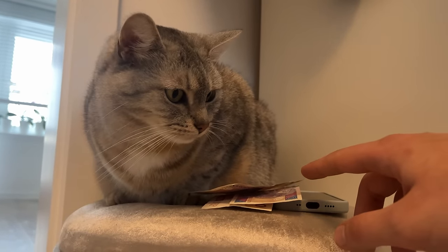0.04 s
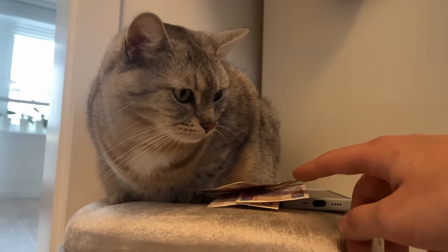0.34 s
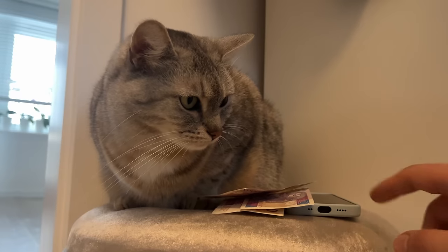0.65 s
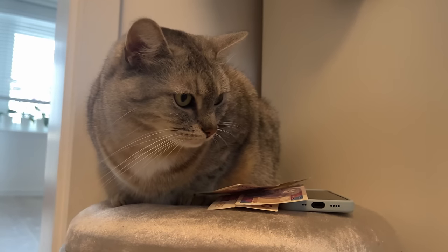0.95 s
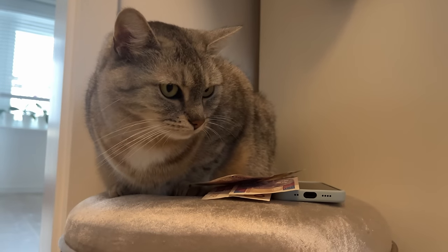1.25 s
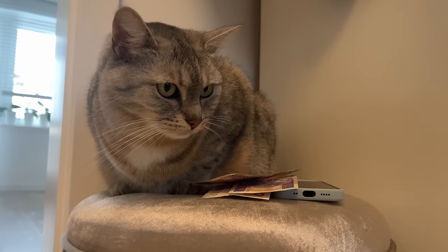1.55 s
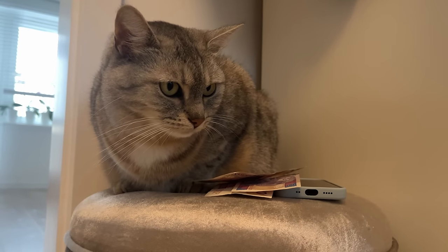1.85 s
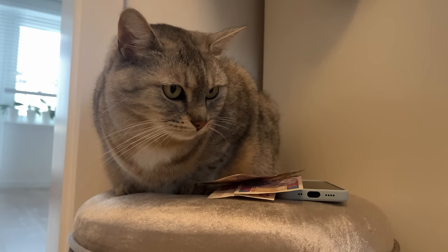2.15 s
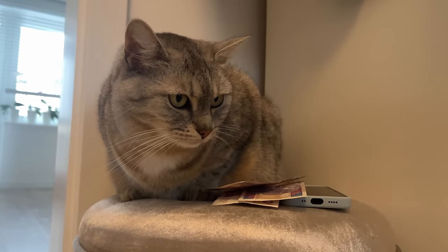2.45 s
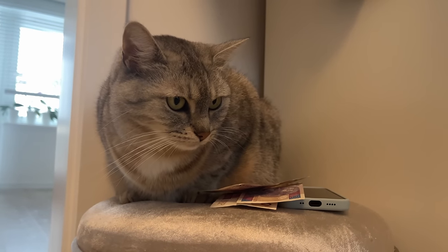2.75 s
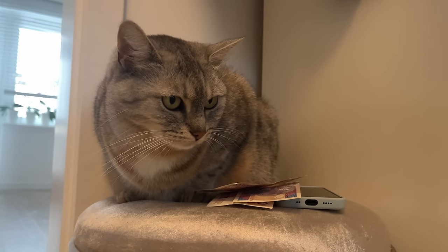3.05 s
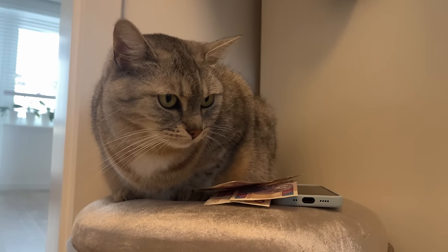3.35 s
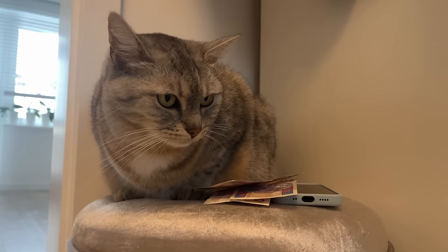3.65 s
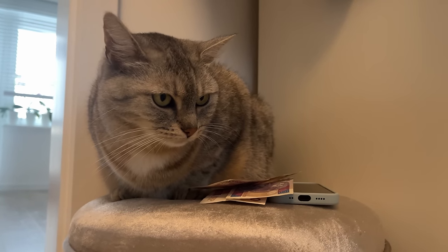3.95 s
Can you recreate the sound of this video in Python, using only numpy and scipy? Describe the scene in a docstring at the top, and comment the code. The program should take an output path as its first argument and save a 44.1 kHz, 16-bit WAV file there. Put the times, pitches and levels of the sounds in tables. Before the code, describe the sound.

Close cat yowling indoors, its drawn-out call sliding down into a raspy growl.

```python
"""A cat's gruff grunt swoops up into a clear yowl, slides down, turns hoarse and settles into a
closed-mouth growl that begins to rise again. The wary cat is close by in a small room, warning off a
hand with one unbroken call. Its vocal folds make the tone and its throat and mouth shape it; uneven
pulses and puffs of air make the rasp. A low rumble and a faint hiss lie underneath."""
import sys
import numpy as np
from scipy import signal
from scipy.fft import rfft, irfft, next_fast_len
from scipy.io import wavfile
from scipy.ndimage import uniform_filter1d

SR = 44100
rng = np.random.default_rng(int(sys.argv[2]) if len(sys.argv) > 2 else 0)


def unload_audio(sound):
    """Save the sound as a 16-bit wav file, at the path given as the first command line argument."""
    columns = np.transpose(np.atleast_2d(sound))
    # keep every value between -1 and 1, then stretch to whole-number steps
    steps = np.round(np.clip(columns, -1, 1) * 32767)
    wavfile.write(sys.argv[1], SR, steps.astype(np.int16))


N = 176400
TIME = np.arange(N) / SR
FFT_SIZE = next_fast_len(N + SR)
BIN_HZ = np.maximum(np.arange(FFT_SIZE // 2 + 1) * SR / FFT_SIZE, 1)

# How fast the vocal folds vibrate: time_s, pitch_hz
GRUNT_PITCH = [(.175, 212.8), (.257, 167.5), (.306, 197.7)]
CALL_PITCH = [(.316, 290.4), (0.395, 406.2), (0.55, 538.6), (0.625, 579.2), (0.68, 554.5), (0.74, 596.5),
              (0.77, 593.6), (0.92, 632.5), (1.2, 623), (1.47, 571), (1.72, 492.8), (1.82, 481),
              (1.9, 447.9), (1.92, 419.6), (1.945, 429.5), (1.975, 393.6), (2.13, 331.9), (2.285, 336.5),
              (2.405, 276.8), (2.491, 275.5), (2.55, 306.7), (2.69, 207.8), (2.775, 214.4), (2.8, 192.4),
              (2.945, 199), (3.115, 183), (3.147, 192.7), (3.54, 184), (3.665, 215.7), (3.755, 206.4),
              (3.99, 282.2)]
# Strength of the harmonics (multiples of the pitch): time_s, first_db, second_db, third_db, upper_db
GRUNT_LEVELS = [(.192, -42.5, -65.5, -78.5, -76.5), (.203, -30, -39.5, -42, -53.5),
                (.255, -24, -38, -32, -42), (.29, -32, -38.5, -42, -63), (.304, -25.5, -39.5, -44, -57.5)]
CALL_LEVELS = [(0.315, -44, -39.5, -58, -61), (0.373, -33.5, -51.5, -50, -45.5),
               (0.487, -26.5, -53, -59, -49.5), (0.791, -31, -45, -61, -41),
               (0.878, -36.5, -48.5, -66.5, -43), (1.22, -40, -47, -67, -42.5),
               (1.312, -32.5, -48, -60.5, -39.5), (1.451, -32.5, -48.5, -61.5, -45.5),
               (1.58, -30.5, -52, -58, -44), (1.83, -26.5, -49, -56, -49), (1.945, -32.5, -46.5, -50, -42),
               (1.991, -37.5, -50, -50.5, -43.5), (2.15, -43, -45.5, -52.5, -48),
               (2.278, -41, -52, -50, -48.5), (2.389, -55.5, -43.5, -54, -49.5),
               (2.569, -57.5, -46.5, -53, -53.5), (2.635, -57.5, -38, -57.5, -49),
               (2.691, -37.5, -42.5, -51, -52), (2.981, -34, -47.5, -46, -60.5),
               (3.499, -33.5, -51.5, -54, -75), (3.781, -39, -42, -62, -59), (4, -51.5, -46.5, -62, -59)]
# Hoarseness, the uneven part of the pulses: time_s, level_db
RASP_LEVELS = [(.187, -69), (.202, -43.5), (.255, -35.5), (.31, -38.5), (.37, -48), (.55, -60), (.81, -54),
               (.92, -66), (1.8, -66), (1.93, -48), (2.15, -45), (2.24, -50.5), (2.32, -43), (2.49, -43.5),
               (2.54, -58), (2.62, -47.5), (2.82, -47.5), (3.5, -52), (4, -49.5)]
# Moments when the pulses fall into groups: centre_s, half_length_s, pulse_count, base_level_db
ROUGH_SPELLS = [(2.155, 0.047, 2, -48), (2.383, 0.08, 2, -53), (2.825, .035, 3, -53), (3.11, .025, 3, -56),
                (3.3, .08, 3, -58.5)]
# Moments when the nose rings: centre_s, half_length_s, boost_db
NASAL_SWELLS = [(1.537, 0.08, 4.5), (2.169, .18, 11.5)]
# How throat and mouth shape the upper harmonics, the rasp and the spit: frequency_hz, gain_db
THROAT_COLOUR = [(720, -3), (1000, 4.5), (1350, -4.5), (1700, -10), (1950, -19), (2300, -42), (2800, -27.5),
                 (3300, -50), (3800, -38), (4350, -29), (4900, -59.5)]
RASP_COLOUR = [(90, -21), (165, -3.5), (280, -12), (360, -4), (450, 9), (560, 2), (760, -8.5),
               (1620, -11.5), (2130, -40), (2780, -33), (3300, -53), (4300, -39), (5500, -62)]
SPIT_COLOUR = [(5800, -12.5), (7000, 8), (11000, -15)]
# How much louder the left microphone is than the right: frequency_hz, balance_db
LEFT_BALANCE = [(260, 0.5), (405, -8), (500, -4.5), (570, 1), (770, 2.5), (970, -9.5), (1190, 3.5),
                (1450, -12), (1950, 7.5), (2900, -4.5), (4400, -16.5), (6000, 4)]
# How far the left wave runs ahead of the right: frequency_hz, lead_radians
LEFT_LEAD = [(220, -0.36), (350, -1.4), (520, -0.36), (800, -1.6), (1700, 0.76)]
# Tone of the background noises: frequency_hz, gain_db
HISS_COLOUR = [(25, -10.5), (160, 2.5), (300, -5), (550, -9.5), (800, -21), (4400, -26), (5900, -38.5),
               (7900, -31.5), (10200, -42.5), (12200, -37.5)]
RUMBLE_COLOUR = [(25, -24.5), (70, 11.5), (95, -9.5), (300, -56.5)]
# How alike the hiss is on the left and right: frequency_hz, correlation
HISS_LIKENESS = [(1000, 0.46), (4000, 0), (12000, 0.54)]
# Loudness of the rumble: time_s, level_db
RUMBLE_LEVELS = [(0, -54.5), (1.17, -56.5), (1.4, -66), (4, -64)]

WAVER_SHARE, WAVER_HZ = .0032, 14   # slow pitch wobble
JITTER_CLEAR, JITTER_HOARSE, JITTER_HZ = .002, .027, 60   # fast wobble, as shares of the pitch
SHIMMER_CLEAR_DB, SHIMMER_HOARSE_DB, SHIMMER_HZ = .2, .9, 32   # loudness flutter
FULL_RASP_DB, BREAKUP_DB = -44, 13   # a full rasp takes BREAKUP_DB from the upper harmonics


def cat(harmonic_count=20):
    """Vibrating vocal folds make a clean tone that shakes more and gains a rasp as it turns hoarse."""
    pitch, = in_time(np.vstack([GRUNT_PITCH, CALL_PITCH]))
    *low_db, upper_db = in_time(np.vstack([GRUNT_LEVELS, CALL_LEVELS]))
    rasp_db, = in_time(RASP_LEVELS)
    hoarse = from_db(np.minimum(rasp_db - FULL_RASP_DB, 0))
    in_threes = sum(swell(s, width) for s, width, group, _ in ROUGH_SPELLS if round(group) > 2)
    jitter = JITTER_CLEAR + JITTER_HOARSE * (hoarse + in_threes)
    wobble = 1 + WAVER_SHARE * drift(WAVER_HZ) + jitter * drift(JITTER_HZ)
    cycles = np.cumsum(pitch * wobble) / SR
    phase = 2 * np.pi * cycles
    clean_db = upper_db - BREAKUP_DB * hoarse
    levels = low_db + [clean_db + throat_db(k * pitch) for k in range(4, harmonic_count + 1)]
    # high harmonics lag, rounding each pulse
    tone = sum(from_db(db) * np.cos((k + 1) * phase - k * k / 10) for k, db in enumerate(levels))
    tone += grouped_pulses(phase, pitch)
    shimmer = from_db((SHIMMER_CLEAR_DB + SHIMMER_HOARSE_DB * hoarse) * drift(SHIMMER_HZ))
    fade_in = np.clip((TIME - GRUNT_PITCH[0][0]) / .034, 0, 1)
    voice = np.sqrt(2) * tone * shimmer + from_db(rasp_db) * rasp(cycles, upper_db)
    return fade_in * (voice + spit(phase))


def throat_db(hz, nasal_hz=2800, nasal_width_hz=220):
    """The throat shapes one gliding harmonic: it flares and fades, and a nasal ring comes and goes."""
    nasal_db = sum(db * swell(s, width) for s, width, db in NASAL_SWELLS)
    nearness = np.exp(-((hz - nasal_hz) / nasal_width_hz) ** 2)
    flare_db = 1.3 * np.minimum(hz / nasal_hz, 1) * drift(WAVER_HZ)
    return at_hz(THROAT_COLOUR, hz) + nasal_db * nearness + flare_db


def grouped_pulses(phase, pitch):
    """Pulses that repeat in twos or threes add tones below and between the low harmonics."""
    tones = 0
    for s, width, group, db in ROUGH_SPELLS:
        group = round(group)
        for k in range(2, 4 * group):
            if k % group:
                gain = from_db(db + at_hz(RASP_COLOUR, pitch * k / group) / 2)
                tones += gain * swell(s, width) * np.cos(phase * k / group + 2 * np.pi * rng.random())
    return tones


def rasp(cycles, upper_db, air_share=.7, smooth_s=.011, mouth_hz=740, open_db=-45.5):
    """Folds that close early or late, and a puff of air in each cycle, make the throat ring."""
    closures = np.diff(np.floor(cycles), prepend=0) > 0
    kicks = closures * rng.choice([-1, 1], N) / np.sqrt(np.gradient(cycles))
    slips = rms_one(filtered(kicks, 1j))   # shift every frequency by a quarter turn
    puffs = rms_one(rng.standard_normal(N) * (1 + np.cos(2 * np.pi * cycles)))
    sound = coloured(slips + air_share * puffs, RASP_COLOUR)
    power = uniform_filter1d(sound ** 2, int(smooth_s * SR))
    power = uniform_filter1d(power, int(smooth_s * SR / 2))
    sound /= np.sqrt(power + 1e-9)   # even out the loudness
    low = filtered(sound, 1 / (1 + (BIN_HZ / mouth_hz) ** 10))
    # the closing mouth muffles the rasp along with the upper harmonics
    muffle = from_db(.39 * np.minimum(upper_db - open_db, 0))
    return low + (sound - low) * muffle


def spit(phase, level_db=-70.5):
    """A short hiss at the height of the grunt, pulsing with the folds."""
    air = coloured(rng.standard_normal(N) * (1 + np.cos(phase)), SPIT_COLOUR)
    return from_db(level_db) * swell(centre_s=.256, half_length_s=.022) * air


def room(sound, echo_s=.3, echo_db=-2, low_cut_hz=920):
    """Near walls colour each microphone differently; a short, bright echo follows."""
    tilt = from_db(at_hz(LEFT_BALANCE, BIN_HZ) / 2) * np.exp(.5j * at_hz(LEFT_LEAD, BIN_HZ))
    pair = np.array([tilt, 1 / tilt])
    direct = pair / abs(pair.mean(axis=0))
    tail = rng.standard_normal((2, N)) * from_db(-60 * TIME / echo_s)
    tail /= np.sqrt(np.sum(tail ** 2, axis=1, keepdims=True))
    echo = from_db(echo_db) * rfft(tail, FFT_SIZE) / (1 + (low_cut_hz / BIN_HZ) ** 2)
    return filtered(sound, direct + echo)


def hiss(centre_db=-60):
    """Steady room hiss: one noise in the centre, another spreading it left and right."""
    centre, side = (coloured(noise, HISS_COLOUR) for noise in rng.standard_normal((2, N)))
    alike = at_hz(HISS_LIKENESS, BIN_HZ)
    wide = filtered(side, np.sqrt((1 - alike) / (1 + alike)))
    return from_db(centre_db) * (centre + np.array([wide, -wide]))


def rumble():
    """A low noise that eases off."""
    level_db, = in_time(RUMBLE_LEVELS)
    return from_db(level_db) * coloured(rng.standard_normal(N), RUMBLE_COLOUR)


def from_db(db):
    """Turn decibels into a multiplier."""
    return 10 ** (np.asarray(db) / 20)


def rms_one(x):
    """Scale a signal to an average strength (rms) of 1."""
    return x / np.sqrt(np.mean(x ** 2) + 1e-20)


def in_time(rows):
    """Join a table's points into one curve per value column."""
    times, *columns = np.transpose(rows)
    return [np.interp(TIME, times, column) for column in columns]


def at_hz(points, hz):
    """Read a table at any frequency, with octaves evenly spaced."""
    frequencies, values = np.transpose(points)
    return np.interp(np.log(hz), np.log(frequencies), values)


def filtered(x, response):
    """Apply a gain to each frequency; mirroring the signal's end avoids a sudden step."""
    padded = np.pad(x, (0, SR // 10), "reflect", reflect_type="odd")
    return irfft(rfft(padded, FFT_SIZE) * response, FFT_SIZE)[..., :N]


def coloured(x, colour):
    """Shape a signal with a colour table, at strength 1."""
    return rms_one(filtered(x, from_db(at_hz(colour, BIN_HZ))))


def drift(rate_hz):
    """A smooth random wander of strength 1."""
    return rms_one(filtered(rng.standard_normal(N), 1 / (1 + (BIN_HZ / rate_hz) ** 4)))


def swell(centre_s, half_length_s):
    """A smooth rise and fall around one moment."""
    return np.exp(-((TIME - centre_s) / half_length_s) ** 2)


def scene():
    """The cat in its room, over hiss and rumble."""
    return room(cat()) + hiss() + rumble()


def record(dry, cutoff_hz=13600):
    """Cut the highest treble steeply."""
    return signal.sosfilt(signal.ellip(10, .1, 80, cutoff_hz, fs=SR, output="sos"), dry)


dry = scene()
out = record(dry)
unload_audio(out)
```